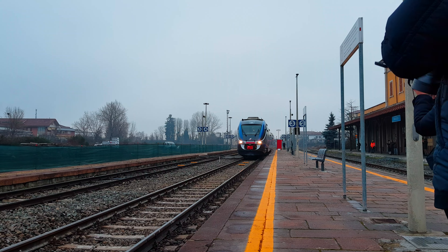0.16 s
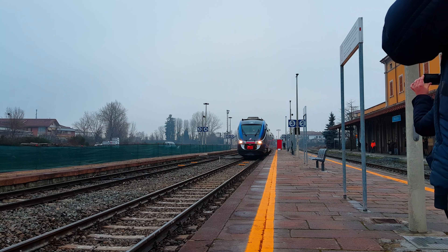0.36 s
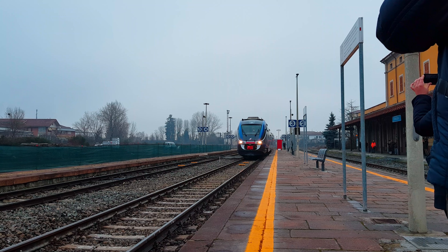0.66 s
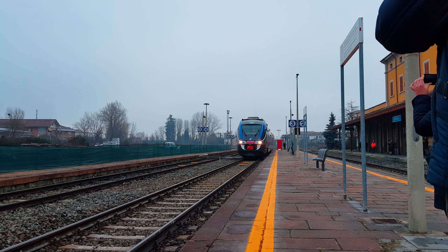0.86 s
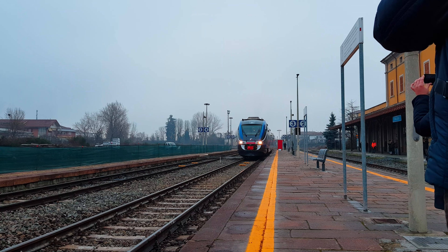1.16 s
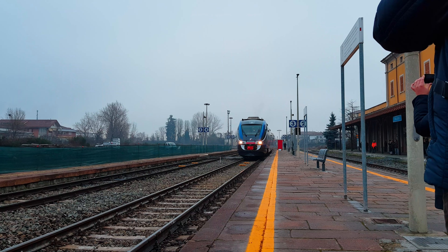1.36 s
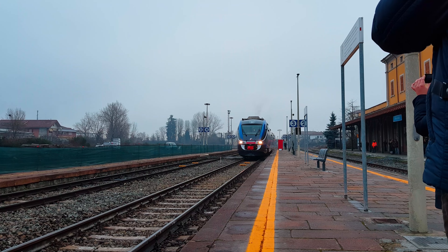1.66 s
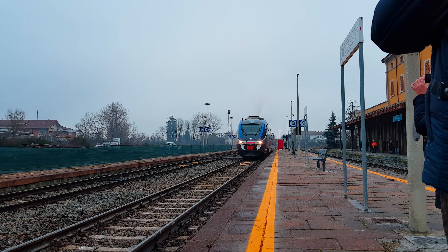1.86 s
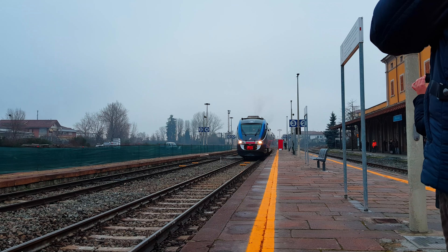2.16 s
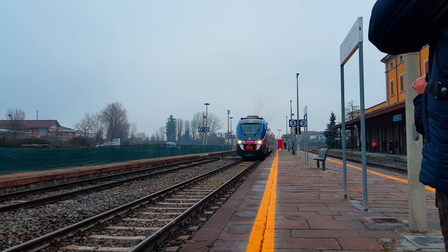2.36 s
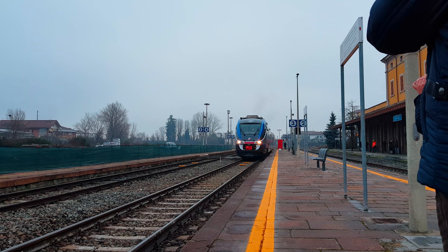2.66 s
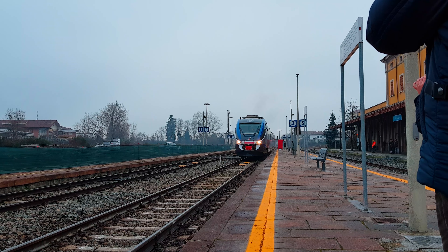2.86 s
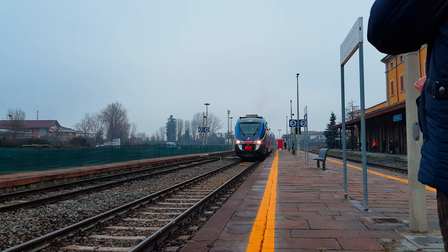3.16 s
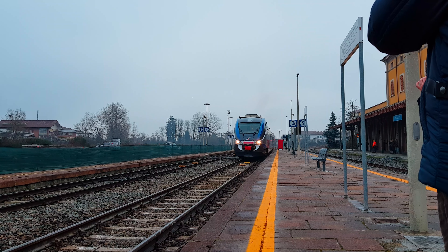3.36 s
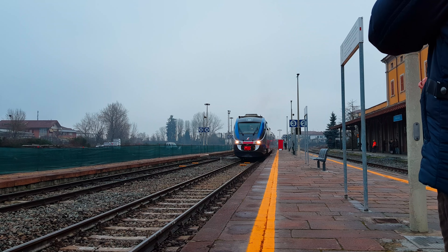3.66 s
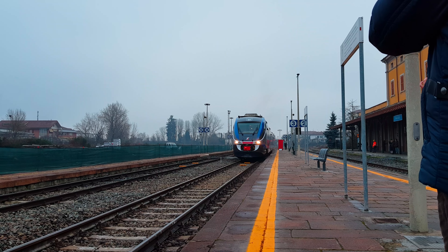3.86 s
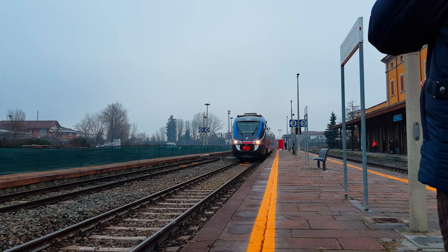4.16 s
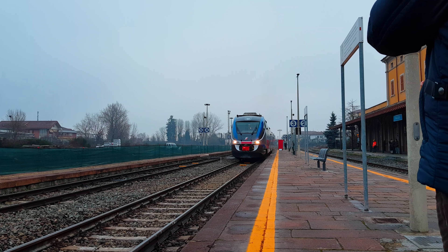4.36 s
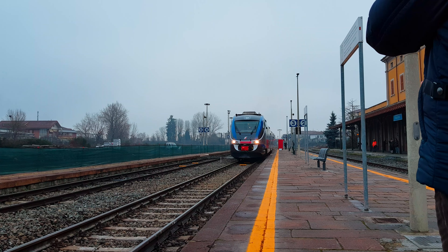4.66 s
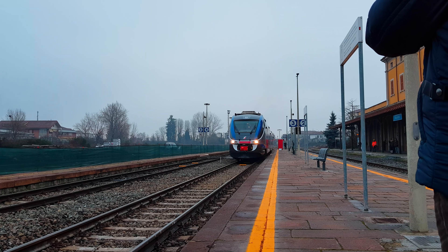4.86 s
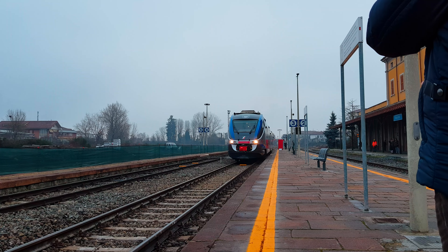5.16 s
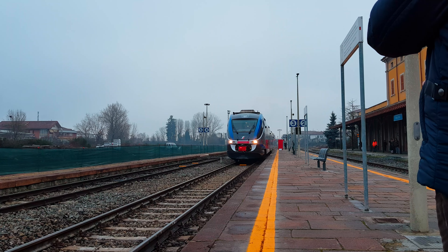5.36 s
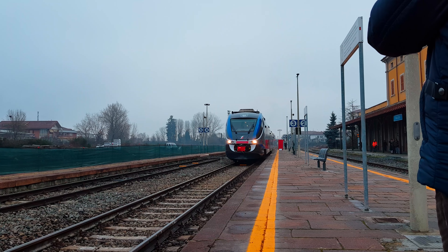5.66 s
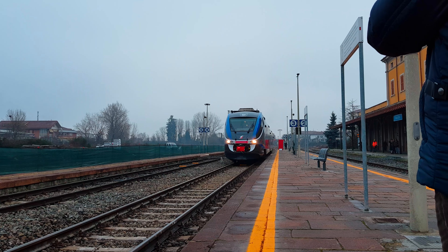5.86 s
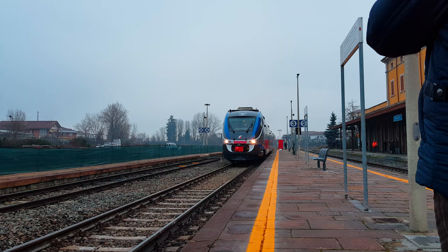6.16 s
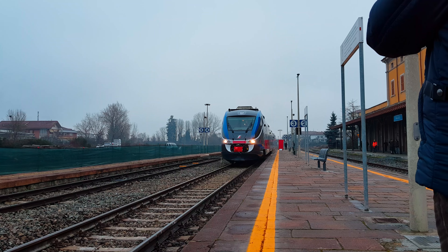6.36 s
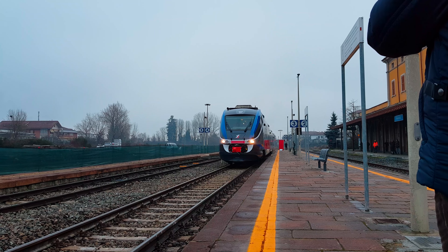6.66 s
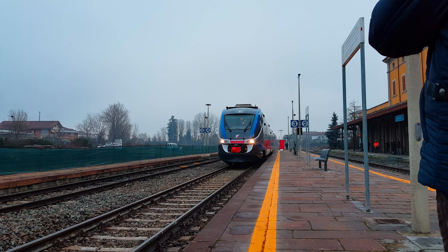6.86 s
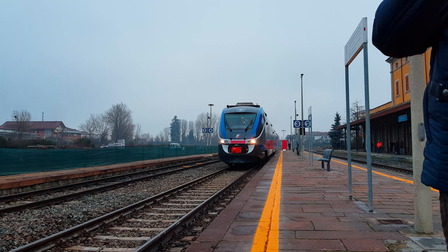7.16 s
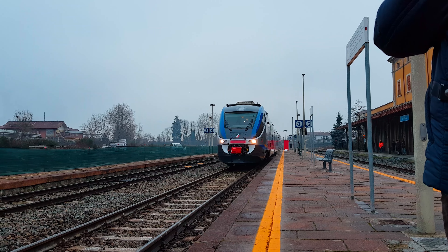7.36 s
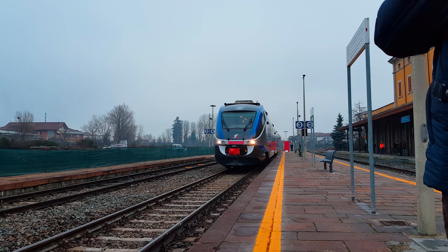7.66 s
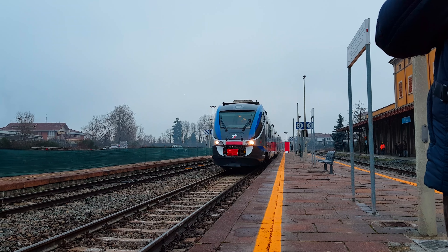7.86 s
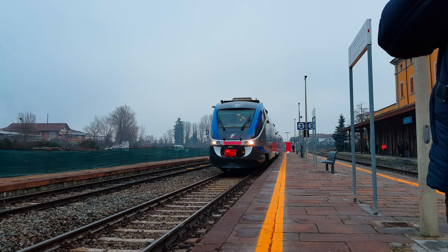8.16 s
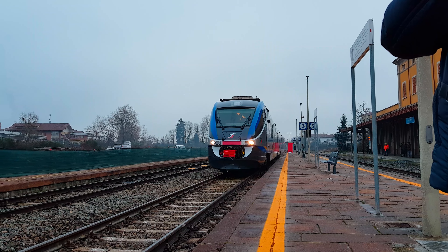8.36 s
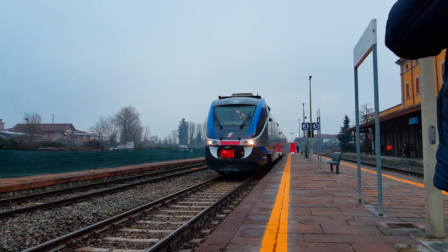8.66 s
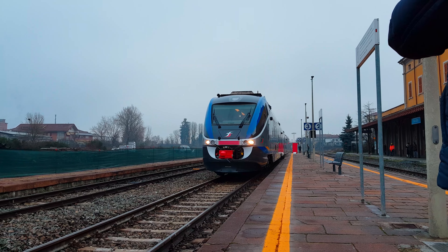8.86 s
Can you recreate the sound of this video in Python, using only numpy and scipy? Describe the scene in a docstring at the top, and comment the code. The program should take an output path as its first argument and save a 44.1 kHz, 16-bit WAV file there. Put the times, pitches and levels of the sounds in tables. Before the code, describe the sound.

A diesel railcar rolls slowly toward stereo microphones on an open station platform. From 0 to 0.6 s a jacket swishes close by, with one bright bird tick at 0.1 s. The low engine hum climbs from about 79 to 104 Hz by 2.2 s, pulling harder, with soft mid-low wavering tones gliding and swelling over it. At 2.4 s the revs fall back, another tick sounds, and by 3 s the engine settles near 90 Hz, droning with slow beating fades. Thin turbo whine, gear tones and a fluttering fan tone ride above the soft rush of wheels and air. Fine hiss steps up around 3.3-3.6 s. Sharp upward bird ticks cluster from 3.75 to 4.45 s, with a minute high squeak at 3.8 s. Drone and hiss gradually grow nearer; after 8 s the pitch sags slightly and three ticks come at 8.4-8.8 s. The train has not passed by 9 s.

```python
"""A diesel railcar rolls slowly towards a listener on an open platform: sines at multiples of the engine cycle rev up
amid wavering tones, over turbocharger, gear and fan tones and the filtered noise of the running gear.
A jacket rustles in noise strokes and a small bird ticks in short sweeps close to the two microphones.
The engine drops back and drones on, the hiss steps up, a tiny squeak pips, and the bird ticks again near the end."""
import sys
import numpy as np
from scipy import signal
from scipy.fft import rfft, irfft, next_fast_len
from scipy.io import wavfile
from scipy.ndimage import uniform_filter1d

SR = 44100
rng = np.random.default_rng(int(sys.argv[2]) if len(sys.argv) > 2 else 0)


def bounce(signal):
    """Save signal as a 16-bit WAV file at the path given by the first command-line argument."""
    frames = np.transpose(np.atleast_2d(signal))
    limited = np.clip(frames, -1, 1)
    pcm = np.round(limited * 32767).astype(np.int16)
    wavfile.write(sys.argv[1], SR, pcm)


def invert_db(level):
    """Linear amplitude ratio for a level in decibels (20 dB per decade), elementwise."""
    return 10 ** (np.asarray(level, dtype=float) / 20)


N = 397782
CRUISE_HZ = 90  # firing rate once the engine has settled


def unit(x):
    """Scaled to rms 1."""
    return x / np.sqrt(np.mean(x ** 2) + 1e-20)


def along(points, hz):
    """Columns of (Hz, value, ..) points, read on a log axis."""
    point_hz, *columns = np.transpose(points)
    return np.squeeze([np.interp(np.log(hz + 1), np.log(point_hz + 1), column) for column in columns])


def curves(rows):
    """One value per sample for each column after the time."""
    time_s, *columns = np.transpose(rows)
    return [np.interp(np.arange(N) / SR, time_s, column) for column in columns]


def wobble(rate_hz, count=1):
    """Smooth random curves, rate_hz knots a second."""
    knots = np.arange(int(N * rate_hz / SR) + 2)
    position = np.arange(N) * rate_hz / SR
    jagged = [np.interp(position, knots, row) for row in rng.standard_normal((count, len(knots)))]
    return uniform_filter1d(np.array(jagged), int(SR / rate_hz / 2), axis=1)


def filtered(x, response):
    """x times a complex response of frequency."""
    size = next_fast_len(N + 8192)
    spectrum = rfft(x, size) * response(np.fft.rfftfreq(size, 1 / SR))
    return irfft(spectrum, size)[..., :N]


def noise(spectrum, patchy_db):
    """Two unrelated coloured noises, scaled to rms 1, under shared patches of random gain."""
    cells = signal.stft(rng.standard_normal((2, N)), nperseg=512)[2]
    field = uniform_filter1d(rng.standard_normal(cells.shape[1:]), size=5, axis=0)
    field = uniform_filter1d(field, size=10, axis=1)
    pair = signal.istft(cells * invert_db(patchy_db * unit(field)), nperseg=512)[1][:, :N]
    return unit(filtered(pair, lambda hz: invert_db(along(spectrum, hz))))


def tones(turns, rms_db, flicker_db, rate_hz, drift_turns=0):
    """Sines at running turns; each fades and drifts on its own along the direct and the scattered path."""
    count = len(turns)
    paths = []
    for path in range(2):
        fading = invert_db(rms_db + flicker_db * wobble(rate_hz, count))
        phase = turns + rng.random((count, 1)) + drift_turns * wobble(rate_hz, count)
        paths.append(np.sum(fading * np.sin(2 * np.pi * phase), axis=0))
    return np.sqrt(2) * np.array(paths)


def swelling(rows):
    """Level change in dB from bell-shaped (centre_s, length_s, level_db) swells and fades."""
    centre_s, length_s, level_db = np.transpose(rows)[..., None]
    bell = np.exp(-8 * ((np.arange(N) / SR - centre_s) / length_s) ** 2)
    return 20 * np.log10(1 + (invert_db(level_db) - 1) * bell).sum(axis=0)


def nearness():
    """Gain in dB as the distance shrinks at a steady speed."""
    start_m, speed_m_per_s = 66.8, 5.57
    return -20 * np.log10(1 - speed_m_per_s * np.arange(N) / SR / start_m)


# engine speed: time_s, firing_hz
ENGINE_SPEED = [(0, 78.7), (.4, 84), (.7, 89), (1, 91.3), (1.5, 99), (1.95, 104), (2.22, 104.5), (2.45, 95),
                (2.82, 94), (3.05, 90.3), (5.2, 89.8), (7.9, 90.4), (8.15, 88.4), (9, 87.9)]


def firing_rate():
    """Firing rate in Hz at each sample."""
    return curves(ENGINE_SPEED)[0]


def engine_cycle():
    """Running engine cycles; eight cylinders fire in each."""
    return np.cumsum(firing_rate()) / SR / 8


# strongest multiples of the engine cycle, the 8th being the firing tone: multiple, start_level_db before fades
STRONG_MULTIPLES = [(4, -28), (8, -17), (6, -38.5), (11, -35.5), (18, -45), (20, -44), (23, -54)]
# single multiples fade or swell, as when two engines slip out of step: centre_s, length_s, level_db, multiple
MULTIPLE_FADES = [(0.286, 2.8, -13.5, 4), (.95, .8, -23, 4), (1.9, 1.04, 2.5, 4), (2.55, 0.41, -15.5, 4),
                  (2.823, 1.1, -22, 4), (4.396, 2.1, -15.5, 4), (7.9, 6, -6.5, 4), (8.95, 1.2, -12.5, 4),
                  (0, 0.47, -6.5, 8), (0.678, 0.99, -15, 8), (1.492, 0.51, -9, 8), (1.907, 0.54, -3, 8),
                  (2.369, 0.33, -12, 8), (3.16, 0.99, -5, 8), (5.1, 1.9, -2.5, 8), (7.4, 1.5, -4, 8),
                  (8.3, .95, -5.5, 8), (.8, 2.2, -7, 6), (3.2, 2.4, -21, 6), (4.803, 2.1, -12.5, 6),
                  (8.5, 1.2, -14, 6), (.6, 1.6, -6.5, 11), (2.3, 0.53, -11.5, 11), (4.905, 0.98, -15.5, 11),
                  (6.296, 2.2, -1, 11), (8.602, 1, -12, 11), (0.105, 2.2, -15.5, 18), (2.102, 1.1, -10, 18),
                  (5.295, 1.1, 4, 18), (6.003, 0.63, -9, 18), (7.197, 1.5, 3, 18), (0, 1.2, -17.5, 20),
                  (1.204, 0.75, 5, 20), (2.301, 4, -16, 20), (4.796, 1.5, -17, 20), (7.2, 1.6, -5.5, 20),
                  (4.208, 3, 13.5, 23), (5.3, 0.55, -9, 23), (6.698, 2.3, 8, 23), (8, 0.64, 3, 23),
                  (9, .7, 8, 23)]


def engine_drone():
    """Firing tone, its half and the prominent other multiples of the engine cycle."""
    multiples = [round(k) for k, db in STRONG_MULTIPLES]
    level_db = []
    for k, db in STRONG_MULTIPLES:
        fades = [row[:-1] for row in MULTIPLE_FADES if round(row[-1]) == round(k)]
        level_db.append(db + swelling(fades))
    level_db = np.array(level_db)
    turns, near_db = np.outer(multiples, engine_cycle()), nearness()
    drone = tones(turns[:2], level_db[:2] + 0.57 * near_db, flicker_db=.5, rate_hz=8)
    prominent = tones(turns[2:], level_db[2:] + 0.35 * near_db, flicker_db=3.0, rate_hz=3.2)
    return drone + prominent


# other multiples of the cycle from the 5th to the 41st, rising: level_db before the swell
GROWL_LEVELS = [-50, -45.5, -42, -41.5, -48, -49.5, -48, -47, -47, -48.5, -48.5, -52, -57.5, -56, -53.5,
                -52, -54, -52.5, -53, -56, -56, -53.5, -61, -58.5, -58, -62, -55, -56.5, -54.5, -67, -57.5]
# swell while the engine pulls hardest: centre_s, length_s, level_db
PULL_SWELLS = [(1.2, 1.6, 3)]
# low engine noise: pitch_hz, density_db per Hz, relative
RUMBLE_SPECTRUM = [(20, -32), (40, -15), (80, -7), (130, -8), (220, -9), (340, -10), (450, -11), (520, -21),
                   (800, -32), (1300, -60)]


def engine_growl():
    """Unequal cylinders add every multiple of the cycle, over a low noise rumble."""
    effort_hz = firing_rate() - CRUISE_HZ
    swell_db = 0.28 * nearness() + .1 * effort_hz + swelling(PULL_SWELLS) - 1.77
    multiples = np.setdiff1d(np.arange(5, 42), [round(k) for k, db in STRONG_MULTIPLES])
    level_db = np.add.outer(GROWL_LEVELS, swell_db)
    growl = tones(np.outer(multiples, engine_cycle()), level_db, flicker_db=4.5, rate_hz=1.6, drift_turns=.06)
    return growl + invert_db(swell_db - 42) * noise(RUMBLE_SPECTRUM, patchy_db=2.2)


# gear teeth and valve gear: multiple of the engine cycle, level_db before a 3 dB cut
GEAR_TONES = [(74, -65), (84, -68), (112, -67), (143, -69), (149, -69), (174, -68), (186, -65), (200, -66)]


def gears():
    """Gear tones turn with the shaft and weaken off the cruising speed."""
    multiples, gear_db = np.transpose(GEAR_TONES)
    racing_db = -.6 * np.abs(firing_rate() - CRUISE_HZ)
    level_db = np.add.outer(gear_db, .7 * nearness() - 3 + racing_db)
    return tones(np.outer(multiples, engine_cycle()), level_db, flicker_db=4, rate_hz=10, drift_turns=.12)


# whine, sinking against the engine speed: time_s, whine_over_firing_rate
TURBO_RATIO = [(0, 25.5), (.7, 24.4), (1.3, 24.55), (2.1, 24.15), (2.5, 23.45), (3.1, 22.75), (5.3, 21.68),
               (7.85, 20.65), (8.3, 19.9), (9, 20)]
# whine swells: centre_s, length_s, level_db
WHINE_SWELLS = [(0, 1.4, -7.5), (1.45, 0.96, 1.5), (2.6, 1.6, -2.5), (5.3, 0.44, 7), (6.2, 1, -0.5),
                (7.3, .8, -2.5)]


def turbocharger():
    """Whine with a faint octave, fluttering in the air between."""
    spin = np.cumsum(curves(TURBO_RATIO)[0] * firing_rate()) / SR
    turbo_db = -57.2 + 0.37 * nearness() + swelling(WHINE_SWELLS)
    level_db = np.add.outer([0, -14], turbo_db)
    whine = tones(np.outer([1, 2], spin), level_db, flicker_db=5, rate_hz=24, drift_turns=.18)
    return whine * [[1], [.5]]  # a narrow source: mostly direct sound


# fan tone bursts: centre_s, length_s, level_db over the base level
FAN_BURSTS = [(.1, 0.7, 6), (1.5, 1.4, 12), (3.15, 0.61, 9.5), (4, 1.2, 8), (5, 0.22, 11), (5.4, 0.41, 12),
              (6.6, .8, 12.5), (7.5, 0.35, 13.5), (8.8, 1.2, 12.5)]


def fan():
    """Cooling fan tone near 609 Hz that swells in bursts, fluttering in the air between."""
    blades = np.cumsum(609 * (1 + .004 * wobble(7))) / SR
    level_db = -57.5 + swelling(FAN_BURSTS)
    return tones(blades[None], level_db, flicker_db=3.5, rate_hz=14, drift_turns=0.092)


# rush: pitch_hz, density_db per Hz, relative
RUSH_SPECTRUM = [(290, -29), (500, -7.5), (720, -9), (830, -9), (1300, -13), (1800, -13), (2500, -18.5),
                 (3100, -21.5), (3900, -18), (4800, -24.5), (5620, -27.5), (6410, -32), (9000, -38),
                 (11700, -59.5)]


def rush(gust):
    """Noise of wheels and cooling air, rising with nearness and engine effort."""
    effort_hz = np.maximum(firing_rate() - CRUISE_HZ, 0)
    level_db = -44 + 0.39 * nearness() + 0.22 * effort_hz
    return invert_db(level_db + 0.35 * gust) * noise(RUSH_SPECTRUM, patchy_db=0.78)


# hiss: pitch_hz, density_db per Hz, relative
HISS_SPECTRUM = [(2940, -25), (5000, -5.5), (5600, -1), (6400, -8), (7970, -8.5), (9330, -13.5),
                 (12100, -13), (15600, -20.5)]


def hiss(gust):
    """Finer noise that grows as the train nears and steps up, as from an air valve opening."""
    air_on_s, air_rise_s, air_db = 3.3, .3, 5
    effort_hz = np.maximum(firing_rate() - CRUISE_HZ, 0)
    step_db = air_db * np.clip((np.arange(N) / SR - air_on_s) / air_rise_s, 0, 1)
    level_db = -67.5 + 0.87 * nearness() + .3 * effort_hz + step_db
    return invert_db(level_db + .7 * gust) * noise(HISS_SPECTRUM, patchy_db=0.5)


def running_gear():
    """Rush and hiss under shared gusts."""
    gust = wobble(6)
    return rush(gust) + hiss(gust)


# rustles: centre_s, length_s, level_db
JACKET_STROKES = [(0.108, 0.35, -56), (.228, 0.086, -61.5), (0.356, 0.53, -63.5), (0.498, .07, -55.5),
                  (0.534, .2, -59)]
# cloth noise: pitch_hz, density_db per Hz, relative
CLOTH_SPECTRUM = [(1500, -45), (3000, -8.5), (5000, 0.5), (8000, -1), (9800, -13.5), (12000, -4.5),
                  (15700, -12)]


def jacket():
    """Cloth slides on cloth in short swishes."""
    time_s = np.arange(N) / SR
    strokes = sum(invert_db(level_db) * np.exp(-8 * ((time_s - centre_s) / length_s) ** 2)
                  for centre_s, length_s, level_db in JACKET_STROKES)
    return strokes * invert_db(3.0 * wobble(70)) * noise(CLOTH_SPECTRUM, patchy_db=2.0)


# ticks: time_s (1 ms after onset), level_db before the path levels, left_over_right_db
BIRD_TICKS = [(0.1157, -43.5, 6), (2.4119, -44, 8), (3.754, -45.5, 18), (3.9454, -41.5, 6),
              (4.0346, -43, -12), (4.2117, -39.5, 9), (4.4367, -42.5, 10), (8.3771, -42, 8),
              (8.5905, -41, 3), (8.77, -42, 3)]


def bird():
    """Each tick is a quick upward sweep, answered at once by the paving and the building."""
    out = np.zeros((2, N + SR))
    t = np.arange(SR // 50) / SR
    for (time_s, level_db, pan_db), bend in zip(BIRD_TICKS, rng.standard_normal(len(BIRD_TICKS))):
        pitch_hz = (6400 + 1200 * t / 0.007) * (1 + 0.029 * bend)
        envelope = np.sin(np.pi * np.clip(t / 0.0064, 0, 1))
        tick = envelope * np.sin(2 * np.pi * np.cumsum(pitch_hz) / SR)
        side_db = np.array([[pan_db], [-pan_db]]) / 2
        for delay_s, path_db in [(0, -5.5), (.0036, -8.5), (.008, -16), (.013, -19)]:
            start = round((time_s - .001 + delay_s) * SR)
            out[:, start:start + len(t)] += invert_db(level_db + path_db + side_db) * tick
    return out[:, :N]


# tones heard while the engine pulls: start_s, end_s, first_hz, last_hz, level_db
WAVERING_TONES = [(.23, .4, 455, 350, -43), (.75, 1.51, 356, 345, -41.5), (1.02, 1.2, 300, 303, -41),
                  (1.45, 2.1, 320, 347, -40.5), (1.45, 2.06, 435, 441, -45), (2.03, 2.4, 368, 310, -39.5),
                  (1.7, 2.3, 730, 757, -50), (1.9, 2.35, 960, 980, -51.5), (1.14, 1.5, 3900, 4400, -63.5),
                  (1.85, 2.35, 4300, 3500, -67)]


def wavers():
    """Soft tones that glide, swell and fade."""
    start_s, end_s, first_hz, last_hz, level_db = np.transpose(WAVERING_TONES)[..., None]
    part = np.clip((np.arange(N) / SR - start_s) / (end_s - start_s), 0, 1)
    turns = np.cumsum(first_hz + (last_hz - first_hz) * part, axis=1) / SR
    swell_db = 10 * np.log10(np.sin(np.pi * part) + 1e-9)
    return tones(turns, level_db + swell_db, flicker_db=2.5, rate_hz=14, drift_turns=0.07)


# one pip close by: start_s, length_s, first_hz, peak_db
SQUEAK_PIP = (3.8175, .015, 12250, -58)


def squeak():
    """A thin pip that turns up at its end."""
    start_s, length_s, first_hz, peak_db = SQUEAK_PIP
    part = np.clip((np.arange(N) / SR - start_s) / length_s, 0, 1)
    turns = np.cumsum(first_hz * (1 + .05 * part ** 4)) / SR
    envelope = np.abs(np.sin(np.pi * part)) ** .4 * (part < 1)
    return invert_db(peak_db) * envelope * np.sin(2 * np.pi * turns)


# pair, nominal: pitch_hz, likeness 0-1, left_lead_rad, left_over_right_db
MICROPHONE_PAIR = [(100, 1, .19, .7), (220, .96, .33, .8), (450, .84, .45, 1.2), (750, .62, .45, 1.3),
                   (1100, .38, .2, -1), (1550, .22, 0, -1.5), (2100, .45, -1, -1.3), (2800, .4, -.2, -1.3),
                   (4500, .42, 0, -1.7), (12000, .36, 0, -1.5)]


def microphones(paths):
    """Direct sound is common to both ports but late on the left; scattered sound differs."""
    nominal_lag_s = .000392  # the train reaches the right microphone first

    def port(side):
        def response(hz):
            alike, lead_rad, balance_db = along(MICROPHONE_PAIR, hz)
            turn = np.arccos(np.clip(alike, 0, 1)) / 2
            shift = np.exp(side * .5j * (lead_rad - 2 * np.pi * hz * nominal_lag_s))
            mix = np.array([np.cos(turn), side * np.sin(turn)])
            return invert_db(side * balance_db / 2) * shift * mix
        return filtered(paths, response).sum(axis=0)
    return np.array([port(0.96), port(-0.98)])  # the sides scale lead, lag and balance to 0.97 of nominal


def scene():
    """The train through the microphone pair, with jacket, bird and squeak close by."""
    engine = engine_drone() + engine_growl() + gears()
    train = engine + turbocharger() + fan() + running_gear() + wavers()
    return microphones(train) + jacket() + bird() + squeak()


def top_cut(x):
    """Nothing passes above the cut-off."""
    return signal.sosfilt(signal.butter(12, 15740, fs=SR, output="sos"), x)


def record(dry):
    """Takes the finished mix to the end of the chain."""
    return top_cut(dry)


dry = scene()
out = record(dry)
bounce(out)
```